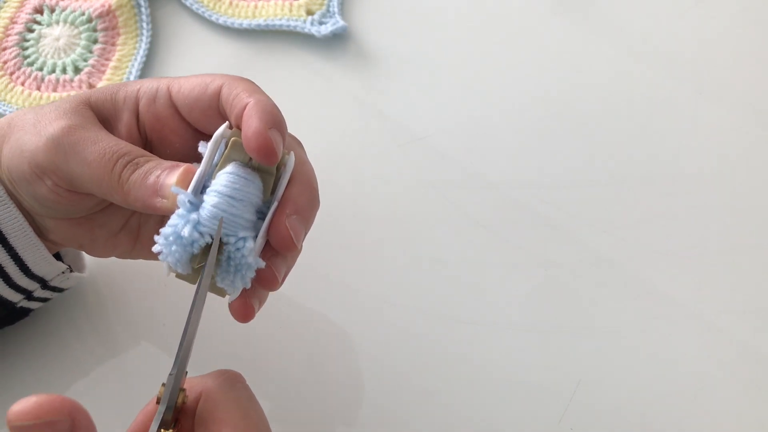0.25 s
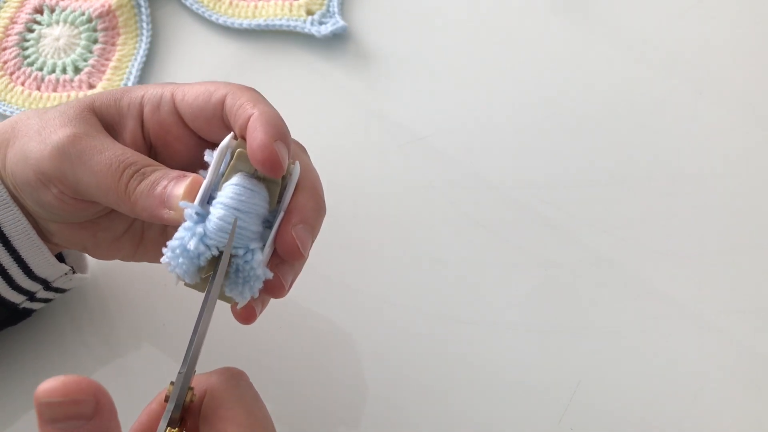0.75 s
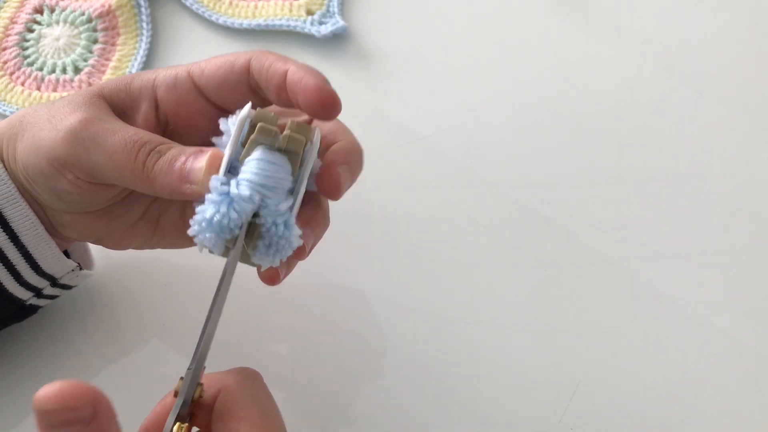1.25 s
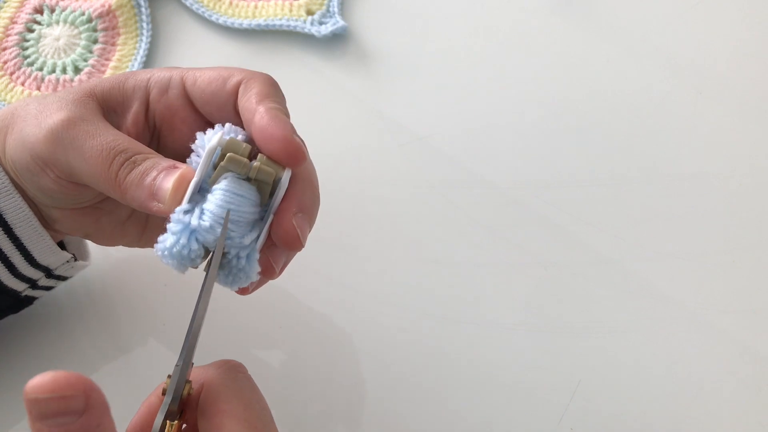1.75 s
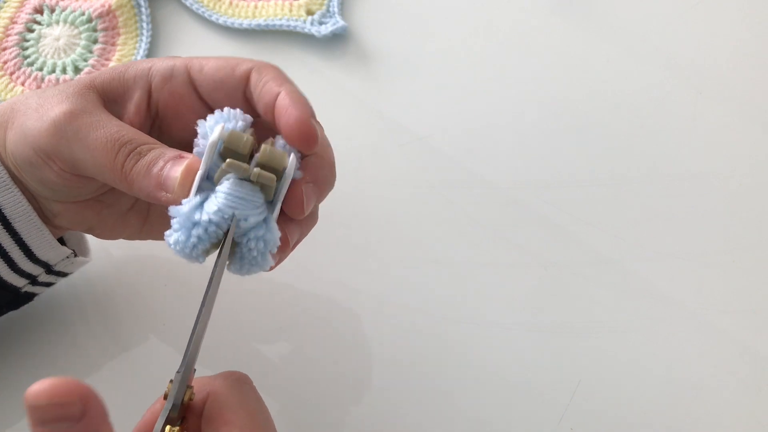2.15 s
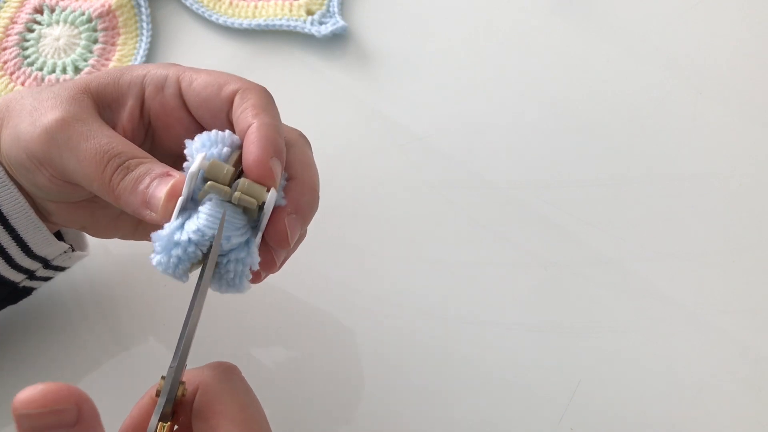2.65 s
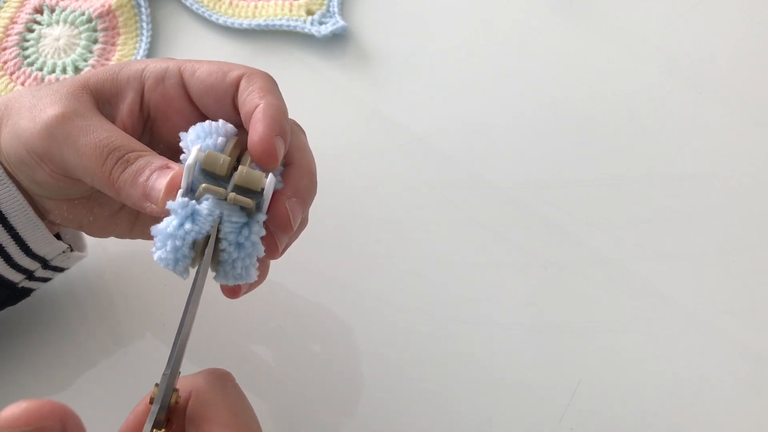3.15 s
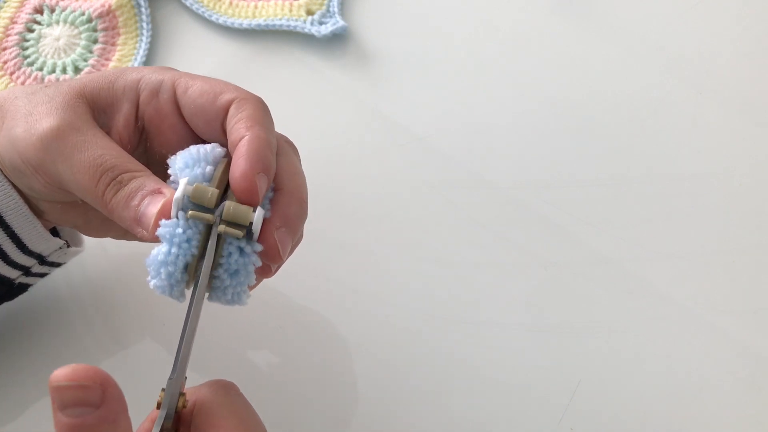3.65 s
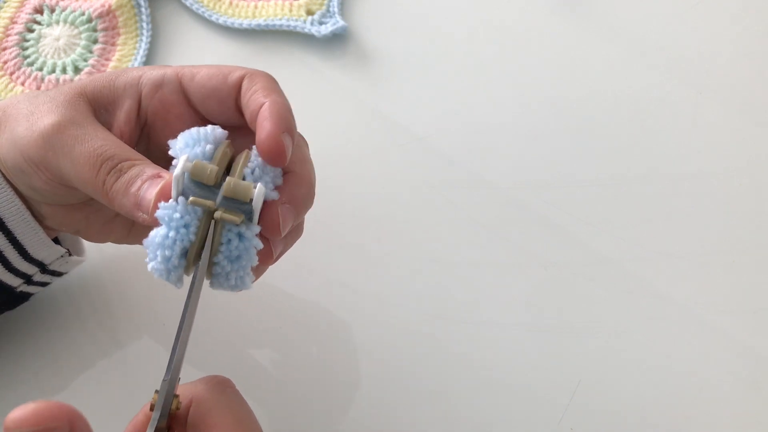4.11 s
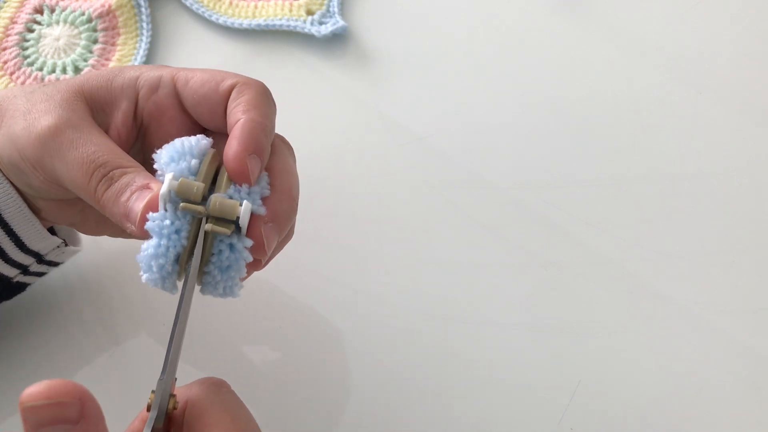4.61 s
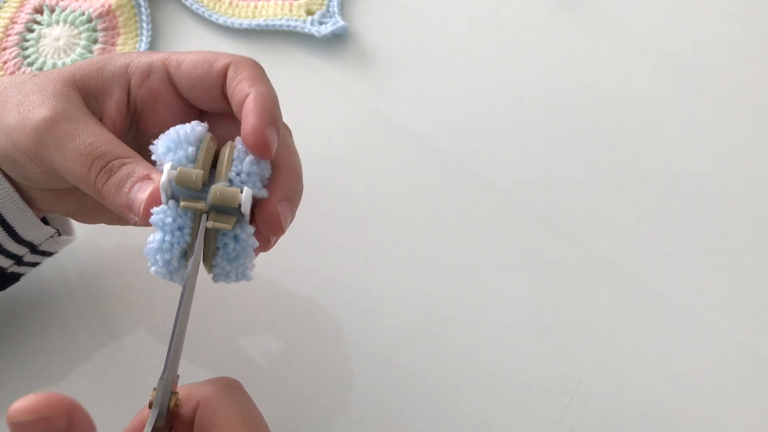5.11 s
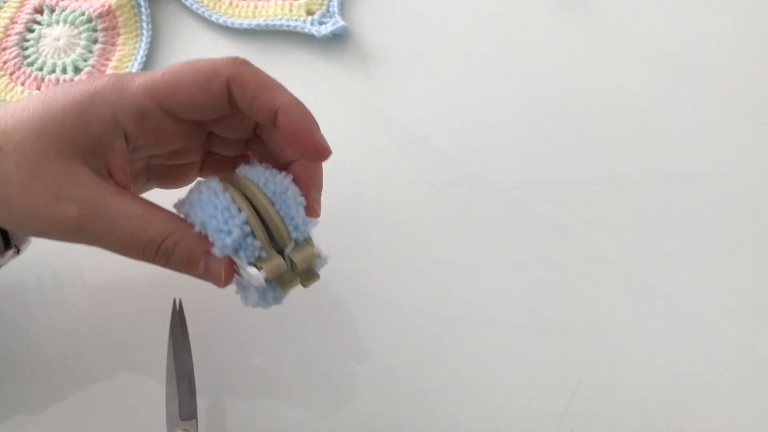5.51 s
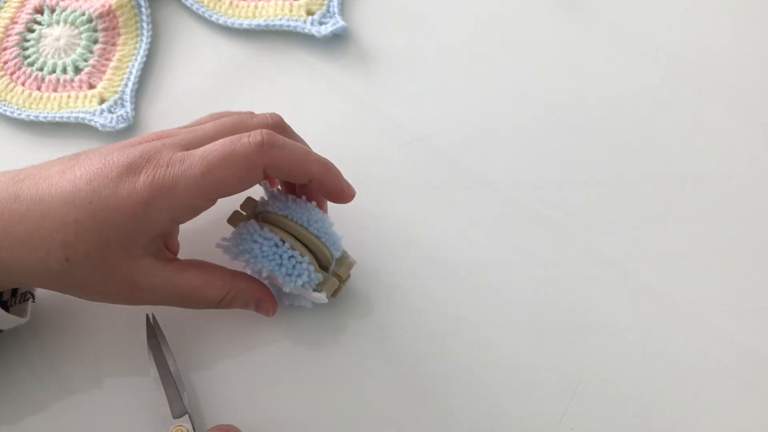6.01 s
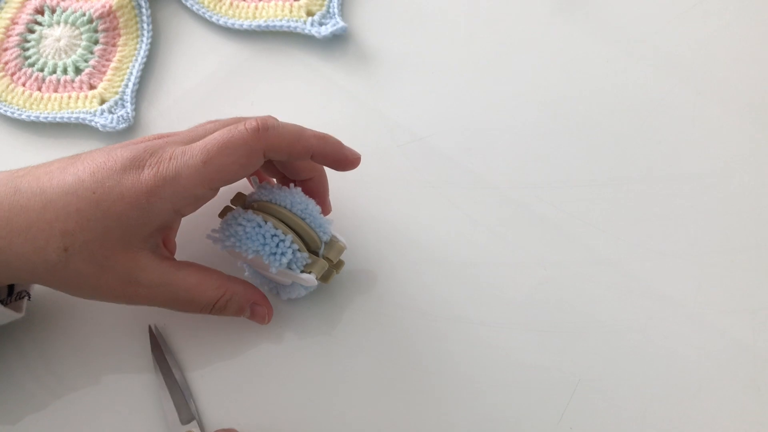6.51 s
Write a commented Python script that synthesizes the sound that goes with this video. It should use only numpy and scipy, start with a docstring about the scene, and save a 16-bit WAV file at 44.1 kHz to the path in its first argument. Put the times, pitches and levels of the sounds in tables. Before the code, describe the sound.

A quiet room with very faint rumble and even hiss, heard closely. Small scissors work through wound yarn: a barely audible crunch and single-strand crackles grow from about 0.7 seconds into a crisp, bright steel snap at 1.1. A plastic tick follows at 1.2, with faint rustling as the blades reopen. Stronger, brighter snaps come at 2.0, 2.9 and 3.7, each preceded by gritty fibre slips and followed by soft rustle and tiny ticks; a double plastic click falls just before the last. Around 4.0 the fingers shift softly on the yarn. At 4.9 the blades close weakly on nothing, then graze plastic near 5.2. Near silence until about 6.5, when the scissors are put down: a bright steel clink, rapid handle knocks and rattling for a tenth of a second, and a soft low tabletop boom dying into short room reverberation.

```python
"""Scissors cutting yarn

Small steel scissors cut through yarn wound on a plastic pompom maker, close by, in a quiet room.
Strands crunch as noisy fibre slips in the blades; the scissors then snap shut, a blow on ringing modes.
The plastic ticks and the yarn rustles. One late, weak closing of the blades meets no yarn.
At the end the scissors are put down: steel clinks, handles clatter and the table top booms softly."""
import sys
import numpy as np
from scipy import signal
from scipy.fft import rfft, irfft
from scipy.io import wavfile

SR = 44100
rng = np.random.default_rng(int(sys.argv[2]) if len(sys.argv) > 2 else 0)


def unload_wav(signal):
    """Save mono or channel-first audio to the path in sys.argv[1] as 16-bit WAV at rate SR, clipped to [-1, 1]."""
    wavfile.write(
        sys.argv[1],
        SR,
        np.round(np.clip(np.atleast_2d(signal).T, -1, 1) * 32767).astype(np.int16),
    )


N = 298452

# closings of the scissors; zero squeeze means no yarn: (snap time [s], energy [dB], contact time [s],
# brightness [dB per octave], squeeze before the snap [s])
CUTS = [(1.0822, -1.3, .0007, -1.0, .24), (2.0411, 5.4, .00055, .8, .23), (2.9143, 3, .0007, .4, .14),
        (3.6752, 5.8, .0008, .4, .11), (4.8810, -9.7, .0008, -.3, 0)]
# resonances of the plastic halves: (frequency [Hz], width of each filter pass [Hz], share of the energy [dB])
PLASTIC = [(170, 99.4, -15), (993, 1600, -7.5), (2319, 3400, -1), (5100, 3700, 0), (6600, 550, -5),
           (8900, 1100, -5), (13690, 3000, -2)]
# damped resonances of the wound yarn: (frequency [Hz], width of each filter pass [Hz], share of the energy [dB])
YARN = [(85.14, 140, -2), (599.5, 250, -5), (980, 510, -2.5), (2200, 2200, -12)]
OPEN_DELAY_S = .15   # from the snap to the reopening of the blades


def from_db(db):
    """Level as a logarithm: decibels to amplitude gain."""
    return 10 ** (np.asarray(db) / 20)


def unit_energy(x):
    """Signal energy: scale so that the squares sum to one."""
    return x / np.sqrt(np.sum(x ** 2) + 1e-20)


def at_hz(known_hz, values, hz):
    """Interpolation in octaves: read a table on a log-frequency axis."""
    return np.interp(np.log(np.maximum(hz, 1)), np.log(known_hz), values)


def add(track, s, sound):
    """Superposition: mix a sound into the track at a time in seconds."""
    at = int(s * SR)
    track[at:at + len(sound)] += sound[:max(N - at, 0)]


def resonate(force, hz, width, db):
    """Resonance: a two-pole filter passed twice for steep sides, scaled to its share of the energy."""
    r = np.exp(-np.pi * width / SR)
    zeros = [1, 0, -1]
    poles = [1, -2 * r * np.cos(2 * np.pi * hz / SR), r * r]
    once = signal.lfilter(zeros, poles, force + 1e-18)   # the offset keeps the filter from denormals
    twice = signal.lfilter(zeros, poles, once)
    return from_db(db) * unit_energy(twice)


def tilted(share_db, brightness_db, hz):
    """Spectral tilt: change a mode's share by so many decibels per octave."""
    return share_db + brightness_db * np.log2(hz)


def strike(blows, body, chatter_db):
    """Modal impact: a kick to each mode at a random moment of the contact, over decaying noisy chatter."""
    out = np.zeros(N)
    t = np.arange(SR // 10) / SR
    for s, db, contact_s, brightness_db in blows:
        sound = 0
        settling = np.exp(-t / (2 * contact_s))
        for hz, width, share_db in body:
            chatter = rng.standard_normal(len(t)) * settling
            force = from_db(chatter_db) * unit_energy(chatter)
            force[int(contact_s * rng.random() * SR)] += rng.choice([-1, 1])
            sound = sound + resonate(force, hz, width, tilted(share_db, brightness_db, hz))
        add(out, s, from_db(db) * unit_energy(sound))
    return out


def scrape(strokes, body, fibres_per_s, spread_db, colour_db=0):
    """Stick-slip friction: a swell of sparse slips of uneven size drives each mode of the body."""
    out = np.zeros(N)
    t = np.arange(SR // 4) / SR
    for s, length, db in strokes:
        swell = t / length * np.exp(-(2 * t / length) ** 2 / 2)   # peaks at half the length
        sound = 0
        for hz, width, share_db in body:
            happens = rng.random(len(t)) < fibres_per_s / SR
            slips = happens * rng.standard_normal(len(t))
            sizes = from_db(spread_db * rng.standard_normal(len(t)))
            stroke_share_db = share_db + colour_db * rng.standard_normal()
            sound = sound + resonate(slips * sizes * swell, hz, width, stroke_share_db)
        # the level is the RMS that this energy has over the stroke's length
        add(out, s, from_db(db) * np.sqrt(length * SR) * unit_energy(sound))
    return out


def room(x, walls_s, near_db, early_db, early_s):
    """Reverberation: near scatter, a cluster of wall echoes, then a diffuse tail decaying band by band."""
    # (frequency [Hz], reverberation time T60 [s], relative level [dB])
    decay = [(100, 1, 0), (500, 0.45, 0.5), (1611, .52, 1.5), (2600, .36, 0), (3770, .32, 3),
             (5550, 0.23, -3), (7000, .28, 2), (9200, .25, 1.5), (11030, .24, 1.5), (15000, 0.16, -2)]
    band_hz, t60, level_db = np.transpose(decay)
    t = np.arange(SR * 3 // 4) / SR
    since = np.maximum(t - walls_s, 0)
    edges = np.geomspace(60, 17000, 21)   # band edges in Hz
    tail = 0
    for low, high in zip(edges, edges[1:]):
        hz = np.sqrt(low * high)
        band_filter = signal.butter(2, [low, high], "band", fs=SR, output="sos")
        band = signal.sosfilt(band_filter, rng.standard_normal(len(t)))
        fading = np.exp(-np.log(1000) * since / at_hz(band_hz, t60, hz))
        tail = tail + band * from_db(at_hz(band_hz, level_db, hz)) * fading
    wall_echoes = 1 + from_db(early_db) * np.exp(-since / early_s)
    build_up = np.where(t < walls_s, from_db(near_db), wall_echoes)
    return signal.oaconvolve(x, unit_energy(tail * build_up))[:N]


def room_tone():
    """Stationary filtered noise: a faint steady rumble with a fainter hiss."""
    # (frequency [Hz], relative spectral density [dB per Hz])
    density = [(15, -45), (25, -12.5), (53, -3), (120, -1), (153, -3.5), (223, -7), (293, -8.5), (317, -10),
               (796, -18), (1020, -18), (1740, -23), (6210, -27.5), (7710, -30), (14800, -30),
               (16000, -32.5)]
    level_db = -67   # RMS
    colour = from_db(at_hz(*np.transpose(density), np.arange(N // 2 + 1) * SR / N))
    noise = irfft(rfft(rng.standard_normal(N)) * colour, N)
    return from_db(level_db) * np.sqrt(N) * unit_energy(noise)


def table_boom():
    """Bending modes: the weight of hand and scissors lands softly and sets the table top swinging."""
    # (frequency [Hz], level [dB], decay time T60 [s])
    bending = [(52, -53, 0.45), (84.2, -38, 0.6), (106.5, -35.5, 0.6), (156, -35, 0.43)]
    start_s, rise_s = 6.512, .012   # onset, time constant of the soft landing
    t = np.maximum(np.arange(N) / SR - start_s, 0)
    modes = 0
    for hz, db, t60 in bending:
        modes = modes + from_db(db) * np.sin(2 * np.pi * hz * t) * np.exp(-np.log(1000) * t / t60)
    return modes * (1 - np.exp(-t / rise_s))


def putting_down():
    """Impact and radiation: steel clinks, handles clatter, and the broad table top feeds the room."""
    # steel meets the table: (time [s], energy [dB], contact time [s], brightness [dB per octave])
    clink_blows = [(6.4763, -0.5, 0.00072, -1.5), (6.4908, -5, 0.0014, -1), (6.5220, -15.5, .003, 0.5),
                   (6.550, -18.5, 0.0046, 0)]
    # the handles rock on the table: (time [s], energy [dB])
    rocking = [(6.4770, -20), (6.4920, -12.5), (6.4990, -7), (6.5214, -6.5), (6.5450, -3.5), (6.5495, -7),
               (6.5750, -12.5), (6.585, -12.5)]
    # resonances of both: (frequency [Hz], width of each filter pass [Hz], share of the energy [dB])
    steel = [(1320, 720, -13.5), (2600, 480, -10.5), (3664, 440, 0.5), (4850, 1400, -3), (5290, 860, -3.5),
             (6520, 1060, -7.5), (8800, 460, -9.5), (9540, 1400, -12.5), (11540, 120, -7.5),
             (13200, 1400, -9.5), (15000, 600, -17)]
    table = [(145, 184, -9), (348, 88, -3), (416, 143, -1), (526, 100, -1.5), (690, 215, 1),
             (922, 144, -0.5), (1090, 230, 1.5), (1350, 340, 3), (1723, 270, 1), (2090, 700, 2),
             (2770, 900, -3), (3460, 1000, -4.5), (5600, 2600, -12)]
    contact_s, brightness_db = .001, -1.6   # of the knocks; brightness per octave
    # between the knocks they rattle, swelling and dying away
    rattle_start_s, rattle_s, rattle_db, rattle_steel_db = 6.535, .08, -44, -54

    clinks = strike(clink_blows, steel, chatter_db=4.0)
    steel_rattle = [(rattle_start_s, rattle_s, rattle_steel_db)]
    clinks = clinks + scrape(steel_rattle, steel, fibres_per_s=1800, spread_db=10)

    knock_blows = [(s, db, contact_s, brightness_db) for s, db in rocking]
    knocks = strike(knock_blows, table, chatter_db=-2.5)
    table_rattle = [(rattle_start_s, rattle_s, rattle_db)]
    knocks = knocks + scrape(table_rattle, table, fibres_per_s=900, spread_db=3)

    into_room = from_db(-2.5) * knocks + from_db(-11.0) * clinks
    echo = room(into_room, walls_s=.015, near_db=-0.5, early_db=-26, early_s=0.02)
    return clinks + knocks + table_boom() + echo


def regripping():
    """Fibre friction: the fingers shift their grip on the wound yarn."""
    # (time [s], level [dB])
    shifts = [(1.42, -71.5), (4.0, -67.5)]
    length_s = 0.14
    return scrape([(s, length_s, db) for s, db in shifts], YARN, fibres_per_s=5000, spread_db=4.5)


def withdrawing():
    """Sliding friction: the blades are drawn out and graze the plastic, duller than a tick."""
    # (time [s], length [s], level [dB])
    grazes = [(5.162, 0.019, -62)]
    brightness_db = -3.5   # per octave
    dull_plastic = [(hz, width, tilted(db, brightness_db, hz)) for hz, width, db in PLASTIC]
    return scrape(grazes, dull_plastic, fibres_per_s=1500, spread_db=4)


def ticking(count):
    """Light impacts: clear ticks, and a few faint ones at random as the blades open in the yarn."""
    # ticks of the blades and the plastic halves: (time [s], energy [dB], brightness [dB per octave])
    clear_ticks = [(.654, -41.5, -3.5), (0.9776, -39, -2), (1.2354, -18.5, 1), (1.4431, -34.5, -0.5),
                   (1.5532, -40, 1), (3.044, -30.5, -2), (3.1045, -40, -5), (3.1328, -36, 2),
                   (3.5659, -27, -2), (3.5704, -23.5, -2), (4.123, -35.5, 4), (4.1527, -34.5, -3.5),
                   (4.914, -25.5, -3.5), (5.1730, -30.5, -1)]
    contact_s = .0009
    faint_db, faint_spread_db, faint_within_s = -43, 2.5, .12
    blows = [(s, db, contact_s, brightness_db) for s, db, brightness_db in clear_ticks]
    for s, *_, squeeze_s in CUTS:
        if squeeze_s > 0:
            times = s + OPEN_DELAY_S + faint_within_s * rng.random(count)
            blows += [(at, rng.normal(faint_db, faint_spread_db), contact_s, 0) for at in times]
    return strike(blows, PLASTIC, chatter_db=-6.0)


def cutting():
    """Friction and fracture: blades nose in, squeeze, shear and reopen; strands slip and the yarn rustles."""
    # resonances under shear: (frequency [Hz], width of each filter pass [Hz], share of the energy [dB])
    blade_shear = [(844, 1100, -10.5), (2450, 1300, -1), (3740, 1000, 1.5), (7500, 4100, -3),
                   (9600, 1700, -1.5), (11400, 1000, -1.5), (13900, 2000, .5)]
    # single strands part, or catch on a blade: (time [s], length [s], level [dB])
    strands = [(.8705, .0062, -54), (.907, .010, -56), (.921, .0065, -49), (1.071, .004, -44.5),
               (1.287, .012, -64), (1.864, .016, -58.5), (1.900, .0065, -51), (1.986, .009, -49.5),
               (2.787, .018, -62), (2.839, .0077, -51.5), (2.850, .0097, -55.5), (2.8826, .0086, -53),
               (2.893, .0094, -48), (3.564, .0074, -53), (3.654, .018, -53)]
    nose_lead_s, nose_s, nose_db = .39, .06, -74.5
    squeeze_share, squeeze_db = .65, -69.5   # length of the crunch as a share of the squeeze
    shear_lead_s, shear_s, shear_below_snap_db = .0075, .011, -48.5
    open_s, open_db = 0.065, -73
    # the yarn rustles under each squeeze and as the blades open
    rustle_lead_s, rustle_s, rustle_db, open_rustle_db = .015, .085, -70.5, -74

    strokes, rubs = list(strands), []
    for s, db, _, _, squeeze_s in CUTS:
        if squeeze_s > 0:
            squeeze_at, open_at = s - squeeze_s, s + OPEN_DELAY_S
            strokes += [(s - nose_lead_s, nose_s, nose_db),
                        (squeeze_at, squeeze_share * squeeze_s, squeeze_db),
                        (s - shear_lead_s, shear_s, db + shear_below_snap_db),
                        (open_at, open_s, open_db)]
            rubs += [(squeeze_at - rustle_lead_s, rustle_s, rustle_db),
                     (open_at, rustle_s, open_rustle_db)]
    crunch = scrape(strokes, blade_shear, fibres_per_s=2200, spread_db=4.0, colour_db=1.5)
    rustle = scrape(rubs, YARN, fibres_per_s=5000, spread_db=4.5)
    return crunch + rustle


def handling():
    """Direct and reverberant sound: crunching strands, ticks and rustles in the hand, with their echo."""
    close = cutting() + regripping() + withdrawing() + ticking(count=2)
    echo = room(from_db(-15) * close, walls_s=0.011, near_db=-7, early_db=-5.0, early_s=0.011)
    return close + echo


def snaps(count):
    """Directional radiation: blades ring differently each way, one to the microphone, others to the walls."""
    # (frequency [Hz], width of each filter pass [Hz], share of the energy [dB])
    scissor_body = [(120, 290, -27), (806, 690, -19), (2590, 390, -5), (3370, 790, -13), (4740, 1400, -5),
                    (5650, 1200, 0.5), (7200, 1800, -8), (8477, 1300, -5), (9350, 970, -2.5),
                    (11650, 2200, -1.5), (13900, 1600, 3.5), (14947, 1200, 4.5)]
    blows = [cut[:-1] for cut in CUTS]
    direct, *outward = [strike(blows, scissor_body, chatter_db=-3.5) for _ in range(count)]
    echo = 0
    for way in outward:
        echo = echo + room(from_db(-20.5) * way, walls_s=0.011, near_db=-7.5, early_db=-2.5, early_s=.012)
    return direct + echo


def scene():
    """Superposition: everything reaches one microphone."""
    return (room_tone() + putting_down() + handling() + snaps(count=4))[None]


def record(dry):
    """Band limiting: the microphone sheds the deepest bass, and the top is cut steeply."""
    cutoff_hz = 16200
    bass_cut = signal.butter(3, 33, "high", fs=SR, output="sos")
    top_cut = signal.ellip(10, .2, 70, cutoff_hz, fs=SR, output="sos")
    thinned = signal.sosfilt(bass_cut, dry)
    return signal.sosfilt(top_cut, thinned)


dry = scene()
out = record(dry)
unload_wav(out)
```